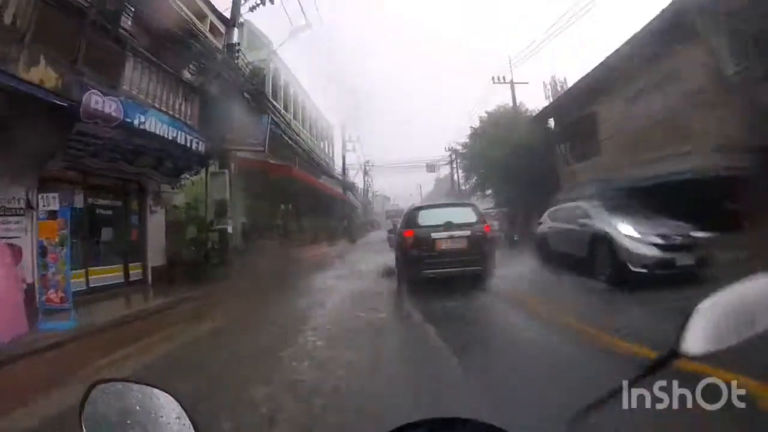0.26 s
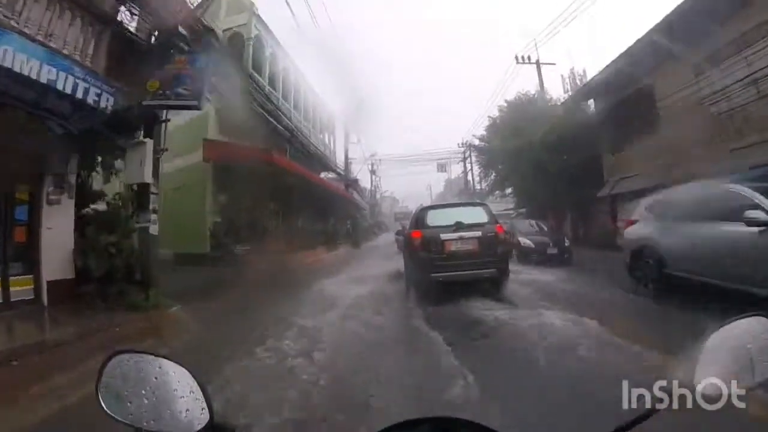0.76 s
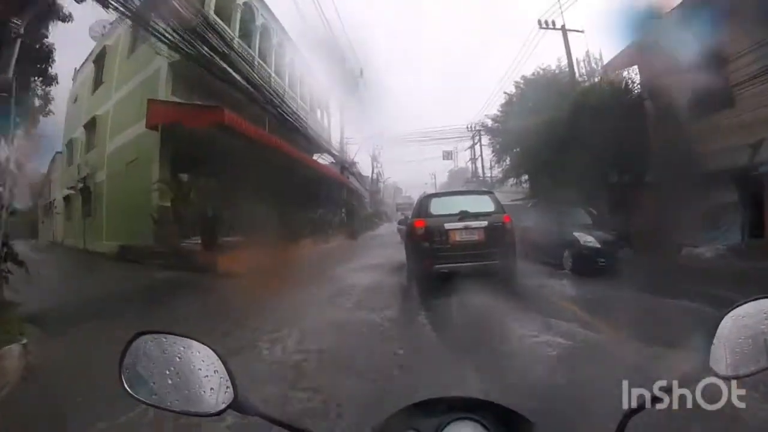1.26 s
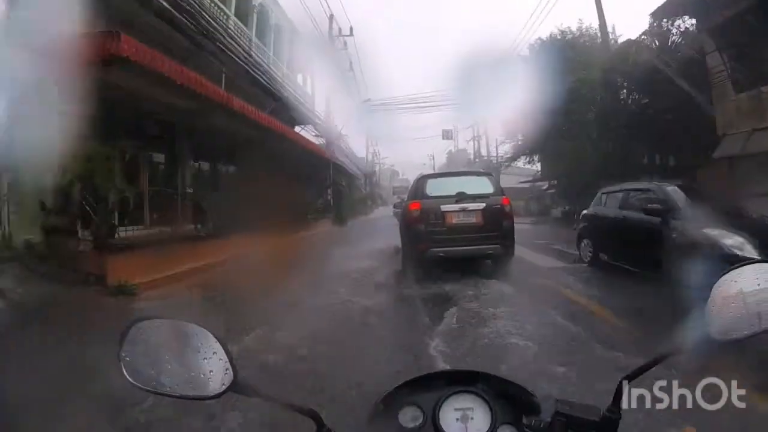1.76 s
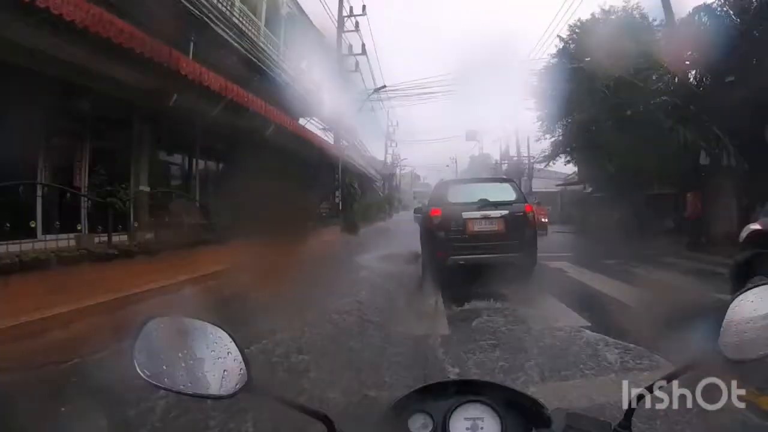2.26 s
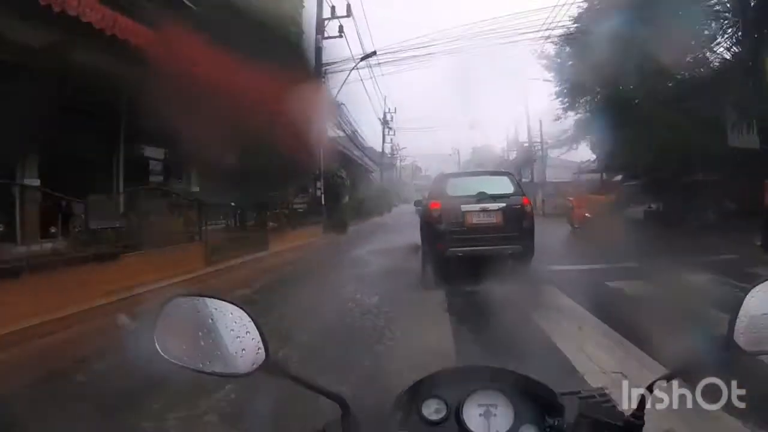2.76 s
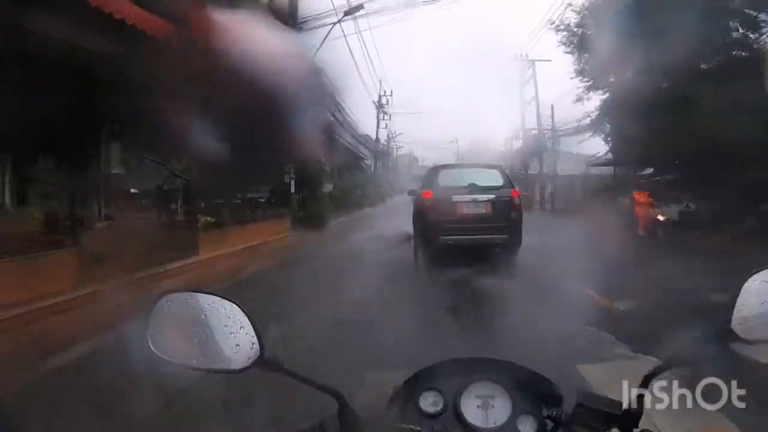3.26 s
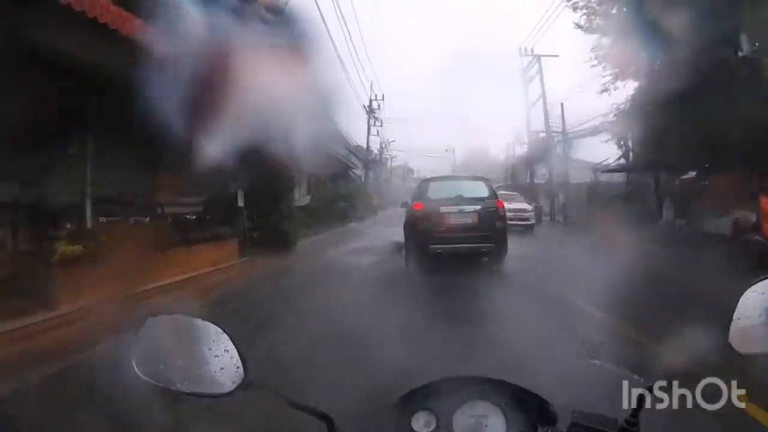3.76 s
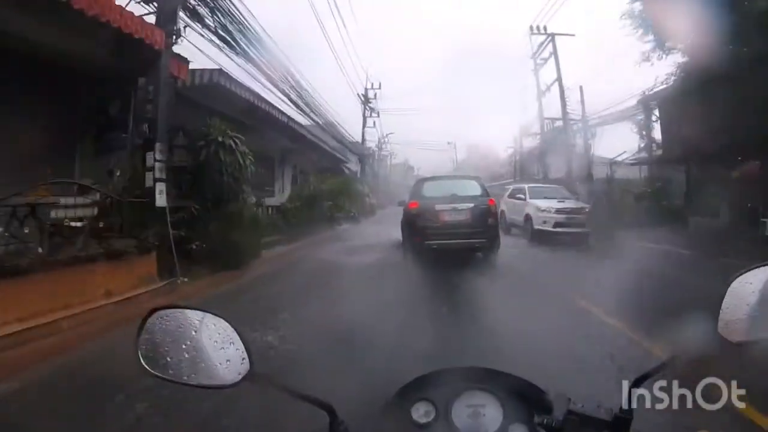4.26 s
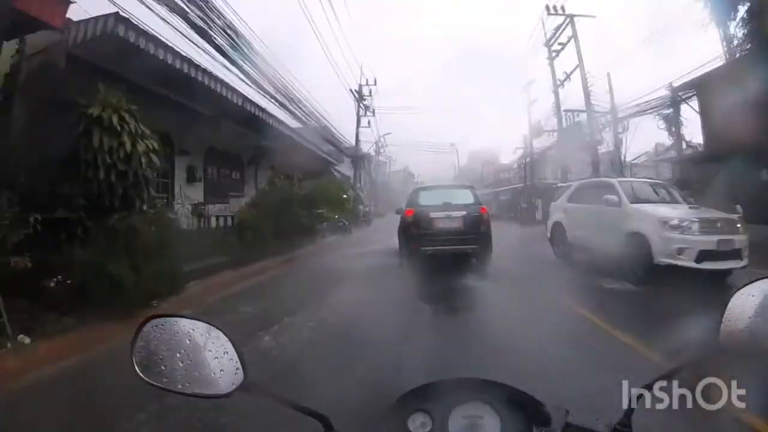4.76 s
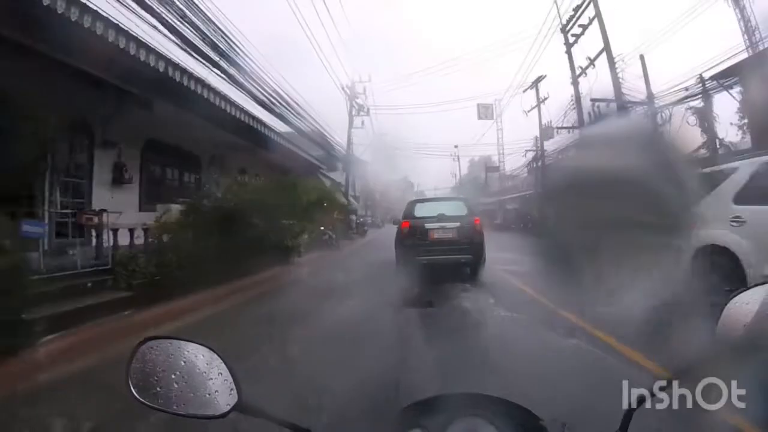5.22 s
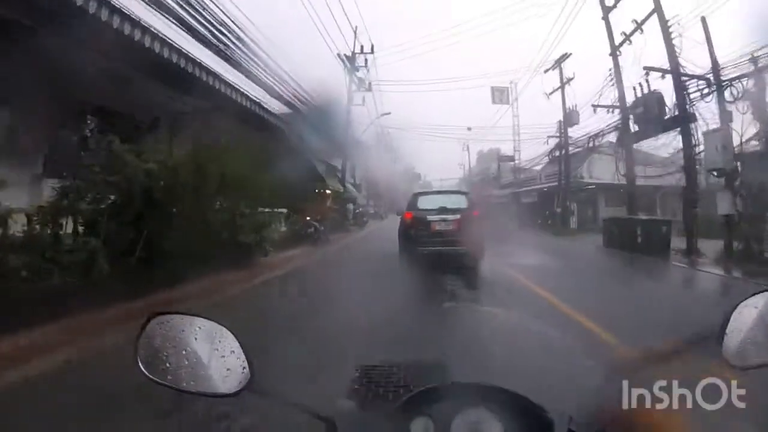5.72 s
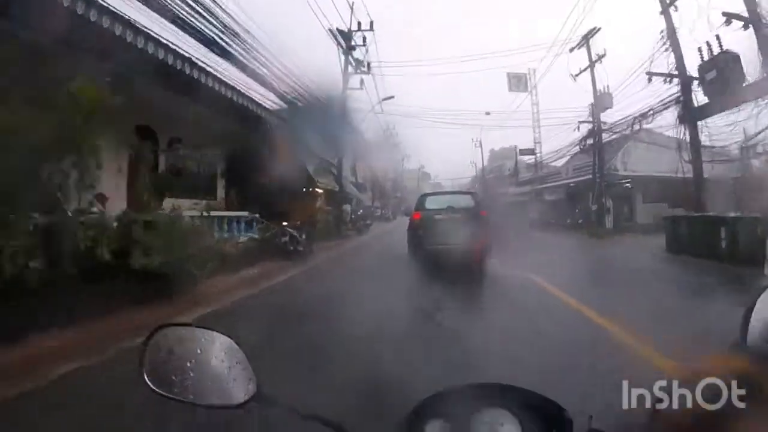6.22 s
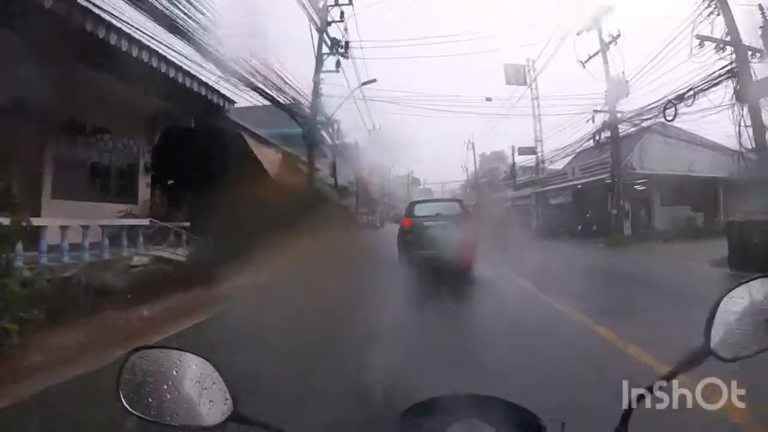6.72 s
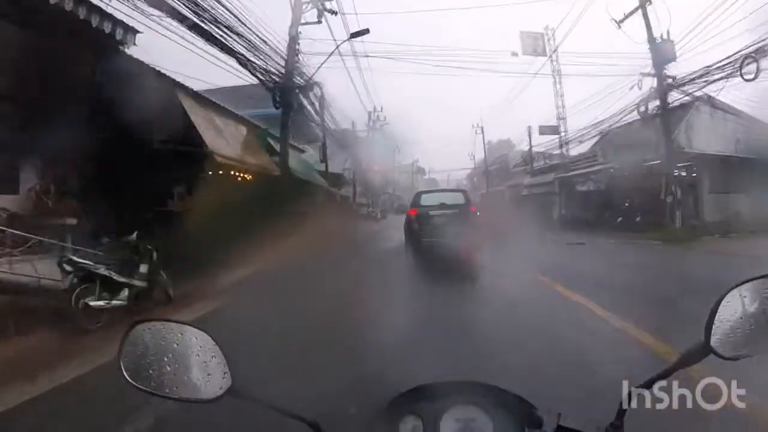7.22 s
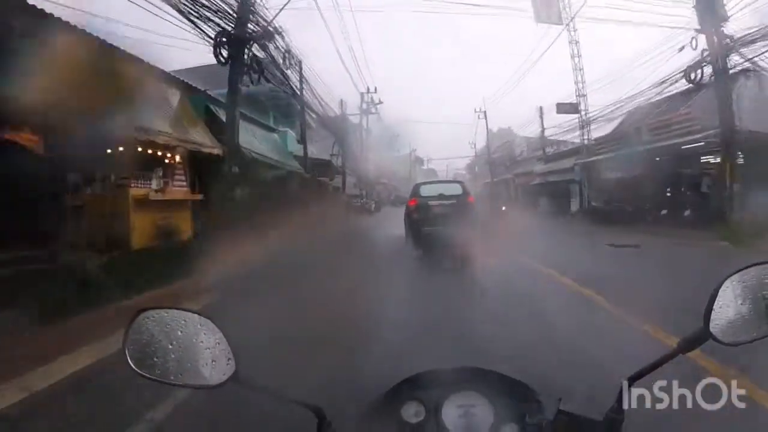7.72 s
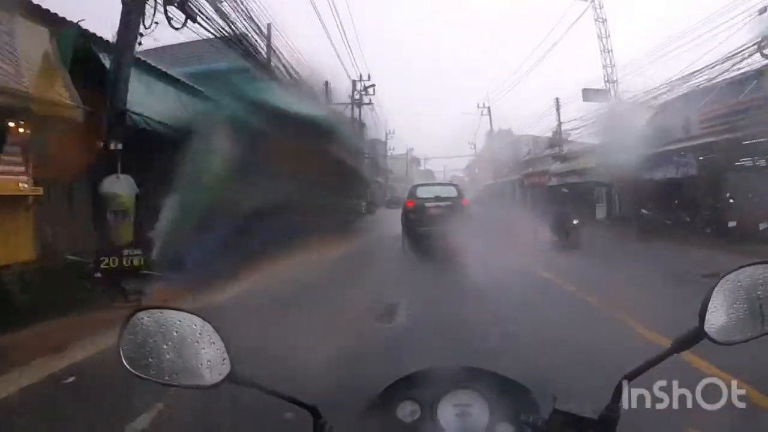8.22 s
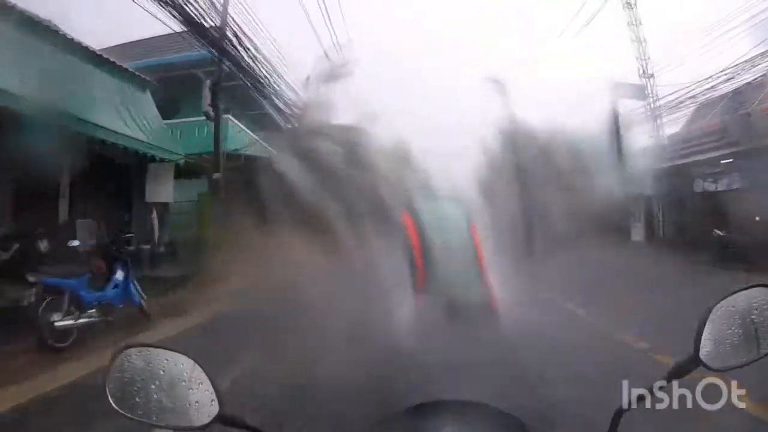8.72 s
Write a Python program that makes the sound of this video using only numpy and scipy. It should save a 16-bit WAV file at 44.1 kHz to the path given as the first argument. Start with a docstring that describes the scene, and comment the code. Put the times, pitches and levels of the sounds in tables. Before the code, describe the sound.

Small motorbike rides through a downpour, bright rain and spray hiss turning muffled as water covers the microphone, with hard drops popping and knocking.

```python
"""Water drops crack and plop on a camera's microphone port: skin crack, splat, air plop, film boom.
The camera rides on a small motorcycle in a downpour. Rain and tyre spray hiss (coloured noise) until
a water film seals the port; then the ride is muffled and the film booms under fine rain.
Case ticks (ringing modes), an engine hum (sines) and wind (low noise) complete the mix.
Strong drops make the camera's limiter duck everything; it recovers slowly."""
import sys
import numpy as np
from scipy import signal
from scipy.fft import rfft, irfft, next_fast_len
from scipy.io import wavfile
from scipy.ndimage import uniform_filter1d

SR = 44100
rng = np.random.default_rng(int(sys.argv[2]) if len(sys.argv) > 2 else 0)


def wav_out(sig):
    """Save sig, one row per channel (or a flat mono array), as 16-bit PCM at SR to the path in sys.argv[1]."""
    wavfile.write(sys.argv[1], SR, np.round(np.clip(np.atleast_2d(sig).T, -1, 1) * 32767).astype(np.int16))


N = 396018
TIME = np.arange(N) / SR


def from_db(db):
    """Decibels to gain."""
    return 10 ** (np.asarray(db) / 20)


def rms_one(x):
    """Scale to rms 1."""
    return x / np.sqrt(np.mean(x ** 2) + 1e-20)


def in_time(rows):
    """Interpolate a (t, value) curve at every sample."""
    t, value = np.transpose(rows)
    return np.interp(TIME, t, value)


def drift(rate_hz):
    """Lowpassed noise of rms 1 with corner rate_hz, computed at SR / 40."""
    step, settle = 40, 2000
    r = np.exp(-2 * np.pi * rate_hz * step / SR)
    noise = rng.standard_normal(N // step + 2 + settle)
    slow = signal.lfilter([1], [1, -2 * r, r * r], noise)[settle:]
    return np.interp(np.arange(N) / step, np.arange(len(slow)), rms_one(slow))


def bandpass(x, order, band_hz):
    """Butterworth bandpass."""
    return signal.sosfilt(signal.butter(order, band_hz, "band", fs=SR, output="sos"), x)


def coloured(x, spectrum):
    """Shape a white signal by a spectrum, interpolated over log f; rms 1."""
    hz, level_db = np.transpose(spectrum)
    size = next_fast_len(N)
    bins_hz = np.maximum(np.arange(size // 2 + 1) * SR / size, 1)
    gain = from_db(np.interp(np.log(bins_hz), np.log(hz), level_db, right=-120))
    return rms_one(irfft(rfft(x, size) * gain, size)[:N])


def ring(clicks, modes):
    """A unit click sets each mode (f/Hz, level/dB, t60/s) ringing as a dying sine."""
    out = 0
    for hz, level_db, t60_s in modes:
        r = from_db(-60 / (t60_s * SR))
        w = 2 * np.pi * hz / SR
        resonator = [0, np.sin(w)], [1, -2 * r * np.cos(w), r * r]
        out = out + from_db(level_db) * signal.lfilter(*resonator, clicks + 1e-18)  # avoids denormals
    return out


def gliding_ring(x, hz, width_hz):
    """A resonance whose centre moves: shift to 0 Hz, lowpass, shift back; rms 1."""
    turn = np.exp(2j * np.pi * np.cumsum(hz) / SR)
    pole = np.exp(-np.pi * width_hz / SR)
    return rms_one((turn * signal.lfilter([1], [1, -pole], x / turn)).imag)


def rainfall(per_s, spread_db):
    """Random impacts of either sign, exponentially spread in dB; rms 1."""
    sizes = from_db(spread_db * np.minimum(rng.exponential(1, N), 4.5))
    signs = rng.choice([-1, 1], N)
    return rms_one(sizes * signs * (rng.random(N) < per_s / SR))


FLOOD_START_S, FLOOD_TAU_S = 2.57, 0.95


def seal(t_s):
    """How far the water film has closed the port, 0 to 1: exponential approach as it floods."""
    return 1 - np.exp(-np.maximum(t_s - FLOOD_START_S, 0) / FLOOD_TAU_S)


# lesser drops from the start of flooding: rate, then mean peak, plop pitch, film ring re plop
SMALL_DROPS_PER_S, SMALL_DROP_DB, SMALL_PLOP_HZ, SMALL_RING_DB = 6.1, -25, 590, 0


def small_drops(rise_cycles=0.6, crack_hz=2100, crack_db=-19, film_hz=235):
    """Lesser drops land at random, exponentially spaced; rows as in PORT_DROPS."""
    chance = rng.standard_normal((60, 6))
    gaps = (chance[:, 0] ** 2 + chance[:, 1] ** 2) / 2  # exponential, mean 1
    times_s = FLOOD_START_S + np.cumsum(gaps) / SMALL_DROPS_PER_S
    rows = []
    for s, (size, pitch, boom, hardness) in zip(times_s, chance[:, 2:]):
        if s < TIME[-1]:
            rows.append((s, SMALL_DROP_DB + 2 * size, SMALL_PLOP_HZ * 2 ** (pitch / 4), rise_cycles,
                         crack_hz * 2 ** (pitch / 5), crack_db + 5 * hardness,
                         film_hz, SMALL_RING_DB + 4 * boom))
    return rows


CRACK_T60_S = 0.0012
SPLAT_DB, CRACK_SPLAT_DB, SPLAT_BAND_HZ = -30, -14, (900, 2500)  # re plop, re crack
PUSH_DB, PUSH_PEAK_S = -23, .006  # re plop

# modes of the camera case, also played by case(): f/Hz, level/dB (relative), t60/s
CASE_MODES = [(5200, 0, 0.00098), (6560, -5.5, 0.0072), (7230, -5, 0.0038), (8340, -3.5, 0.0026)]
# drops on the port: t/s, peak level/dB before the limiter, plop f/Hz, plop rise/cycles,
# crack f/Hz, crack level/dB re plop, film f/Hz, film ring level/dB re plop
PORT_DROPS = [(1.577, 10.5, 715, 1.14, 1890, -8, 243, 6), (1.647, 17.5, 530, 0.4, 1700, -20, 253, -14),
              (1.6742, 12.5, 515, 1.45, 2000, -28, 234, 4.5), (1.868, -8, 525, 0.51, 2100, -36, 225, 5.5),
              (2.353, -16, 520, 0.55, 2100, -70.5, 235, 11), (2.839, -9, 740, 2, 2040, 7.5, 272, 7),
              (2.862, -4.5, 710, 1.4, 2100, -22.5, 232, -5), (2.964, -9.5, 605, 0.34, 1200, -2, 226, 14),
              (3.007, -15.5, 940, 0.73, 1600, 4, 238, 8), (3.028, -7.5, 600, 0.67, 1900, -1, 258, -1.5),
              (3.131, -4.5, 480, 0.86, 2120, -31, 235, 10), (3.203, -7.5, 495, 1.6, 2300, -8, 228, -1),
              (3.336, -16.5, 695, 1.1, 2300, 7.5, 242, 10.5), (3.456, -8, 500, 0.63, 2100, -25, 236, 17),
              (3.547, -7.5, 299, 0.54, 2100, -31, 232, 7), (3.603, -12.5, 520, 0.49, 2100, -27, 242, 4),
              (3.776, 11, 810, 0.52, 1870, -1.5, 213, 15), (3.831, 29.5, 510, 0.42, 1680, -18, 240, -2.5),
              (3.996, 10.5, 607, 0.38, 1350, -22, 237, 8), (4.006, -11, 700, 1.1, 2200, -3, 245, 3),
              (4.118, 12.5, 615, 1.37, 1910, -25, 227, -1), (4.441, -13.5, 604, 0.58, 2315, -9, 247.7, 4.5),
              (4.725, -16.5, 604, 0.48, 2650, -11, 240, 5.5), (4.776, -3.5, 650, 0.8, 1090, -27, 231, 5.5),
              (4.879, 11.5, 610, 0.73, 1770, -11, 233.5, 8.5), (4.893, -4.5, 700, 1, 1900, -2, 234, 8),
              (5.107, -12, 534, 0.69, 2100, -22, 240, 10), (5.201, -14, 845, 0.36, 2260, 24, 240, -5),
              (5.3118, 15, 704, 0.69, 1880, -13.5, 223, -2.5), (5.393, -4, 560, 1.1, 2010, -18, 228, 6),
              (5.518, -8, 576, 1.1, 2000, -29, 240, -3.5), (5.609, -12.5, 670, 2.3, 2000, -10, 240, -15),
              (5.854, -5, 594, 1.2, 2000, -19, 240, -5), (5.8635, 10, 568, 0.79, 1480, -32, 243, -11.5),
              (5.9534, -3.5, 750, 0.81, 1840, -3, 239, -1.5), (6.1, -7.5, 560, 0.8, 2100, -24, 232, 17),
              (6.162, -10.5, 567, 3.5, 2000, -34, 245, -12), (6.548, -8, 570, 0.66, 2100, -22, 232, 26),
              (6.396, -5, 600, 1.3, 2186, -34, 240, -4), (6.4461, 4.5, 605, 1.1, 1520, -35, 218, 10.5),
              (6.601, -5, 590, 0.72, 1490, -21, 248, -4), (6.675, 12, 620, 0.89, 1550, -37, 214, -8.5),
              (6.766, -11.5, 606, 1.5, 2200, -11, 238, -1), (6.876, -5, 590, 1.4, 2130, -16, 240, -7),
              (6.917, 6.5, 600, 1.4, 2000, -12, 231, 1), (6.9316, 15, 600, 0.75, 2000, -17, 260, -15),
              (7.159, -3, 670, 1.1, 2100, -19, 248, -8), (7.212, -12.5, 636, 0.75, 2200, -5.5, 237, 3),
              (7.231, -5, 480, 1.6, 2090, -30, 224, 1), (7.397, -7.5, 780, 0.38, 2180, 0.5, 243, 11),
              (7.433, -13, 655, 0.88, 2210, 3, 242, 13.5), (7.498, -8, 657, 0.59, 2120, -17, 243, -16),
              (7.833, -22, 636, 0.87, 2100, -18, 242, 12), (7.915, 26, 697, 1.5, 2000, -14.5, 188, -1),
              (8.0856, 31.5, 850, 0.96, 1700, -3.5, 167, 1), (8.126, -5, 560, 0.91, 2100, -22, 243, 16),
              (8.232, -10, 560, 0.71, 2100, -22, 230, 14), (8.461, -13.5, 560, 1.5, 2000, -21, 238, 0),
              (8.618, -14.5, 565, 0.66, 2000, -17, 236, -1), (8.643, -7, 560, 0.49, 2100, -18, 218, 11),
              (8.7484, 40.5, 755, 0.48, 1830, -1.5, 131, -1.5),
              (8.841, -21.5, 550, 0.79, 1980, -1, 240, -5), (8.887, -10, 520, 0.51, 2100, 1, 243, 16),
              (8.928, -16, 670, 0.66, 2120, 10.5, 243, 15)]


def port_drops(film_decay_s=0.012, film_damping=0.3, film_rise_s=0.0014, contact_s=0.00008,
               hardening=0.01, mix_db=2, case_db=-7, splat_s=0.0012):
    """Contact cracks and splats on water and case, squeezed air plops, the pushed film rings out."""
    out = np.zeros(N)
    age = TIME[:SR // 10]
    for s, peak_db, plop_hz, rise_cycles, crack_hz, crack_db, film_hz, ring_db in (
            list(PORT_DROPS) + small_drops()):
        # each hit: own mix of case modes; stronger drops: shorter, brighter contact
        modes = [(crack_hz, 0, CRACK_T60_S)]
        for hz, db, t60_s in CASE_MODES:
            modes.append((hz, db + case_db + mix_db * rng.standard_normal(), t60_s))
        contact = age * np.exp(-age / contact_s * from_db(hardening * peak_db))
        crack = ring(contact, modes)
        crack = from_db(crack_db) * crack / np.abs(crack).max()

        splat = rms_one(bandpass(rng.standard_normal(len(age)), 2, SPLAT_BAND_HZ))
        splat_gain = from_db(SPLAT_DB) + from_db(CRACK_SPLAT_DB + crack_db)
        splat = splat_gain * splat * np.exp(-age / splat_s)

        cycles = plop_hz * age
        rise = cycles / rise_cycles
        plop = (rise * np.exp(1 - rise)) ** 2 * np.sin(2 * np.pi * cycles)

        # hard drops tear the film: it knocks instead of ringing
        decay_s = film_decay_s * from_db(-film_damping * max(peak_db, 0))
        boom_shape = (1 - np.exp(-age / film_rise_s)) * np.exp(-age / decay_s)
        boom = from_db(ring_db) * boom_shape * np.sin(2 * np.pi * film_hz * age)
        push = from_db(PUSH_DB) * age / PUSH_PEAK_S * np.exp(1 - age / PUSH_PEAK_S)

        hit = plop + splat + push + boom - crack
        hit = from_db(peak_db) * hit / np.abs(hit).max()
        start = round(s * SR)
        out[start:start + len(age)] += hit[:N - start]
    return out


WETTED_S, WET_DRAIN_TAU_S = 1.6, 0.59  # first wetting
SPRAY_DB, WET_LOSS_DB, SEALED_LOSS_DB = -24, 9.5, 43.5  # open port, losses to water
SPIT_DB, SPIT_T60_CYCLES, SPIT_RANGE_HZ = -16, 34, (2300, 8060)  # dB re hiss before colouring

# spectrum of rain and tyre spray: f/Hz, level/dB (relative, per Hz)
SPRAY_SPECTRUM = [(120, -1.5), (200, -5.5), (300, 6.5), (600, 4), (1000, -0.5), (2400, -1.5), (4300, -7.5),
                  (5200, 3), (6500, -3.5), (8000, -10.5), (10000, -21), (12500, -36), (13500, -50)]


def spray(flicker_db=1.18):
    """Road splashes merge into a hiss; nearer ones crackle and spit. Water on the port muffles it."""
    wet = (TIME > WETTED_S) * np.exp(-np.abs(TIME - WETTED_S) / WET_DRAIN_TAU_S)
    level_db = SPRAY_DB - WET_LOSS_DB * wet - SEALED_LOSS_DB * seal(TIME)
    level_db = level_db + 1.5 * drift(11) + flicker_db * drift(90)
    crackle = from_db(-9) * rainfall(per_s=380, spread_db=4)
    splashes = rainfall(per_s=300, spread_db=3.5)
    pitches_hz = np.geomspace(*SPIT_RANGE_HZ, 14)
    dealt = rng.integers(0, len(pitches_hz), N)  # one pitch per splash
    spits = 0
    for k, hz in enumerate(pitches_hz):
        spits = spits + ring(splashes * (dealt == k), [(hz, 0, SPIT_T60_CYCLES / hz)])
    grain = rng.standard_normal(N) + crackle + from_db(SPIT_DB) * rms_one(spits)
    return from_db(level_db) * coloured(grain, SPRAY_SPECTRUM)


BOOM_DB, PATTER_DB = -19, -29.5  # before RAIN_ON_FILM and skin gain
FILM_HZ, FILM_WIDTH_HZ, FILM_WAVER_HZ = 229, 13, 8  # boom; wavers as the water shifts (rms)
FILM_RING_DB, FILM_RING_WIDTH_HZ = -30, 120  # upper ring, part of the patter
FILM_COMPLETE_AT = 0.5  # share of the seal from which the film rings fully

# how hard rain beats on the film: t/s, level/dB (boom; the patter takes half the dB)
RAIN_ON_FILM = [(2.7, -7), (3.4, -1), (3.7, -1), (4.3, -3.5), (5.7, -1), (6.45, 0.5), (7.1, -5.5),
                (7.6, -4), (7.85, 1.5), (8.3, -5), (8.65, 1), (8.98, -0.5)]
# upper ring, sinks as water gathers, rises as it runs off: t/s, f/Hz
FILM_RING_HZ = [(2.8, 794), (3.6, 766), (4.5, 708), (5.6, 646), (6.3, 582), (7.2, 620), (7.8, 758),
                (8.98, 735)]
# spectrum of the patter: f/Hz, level/dB (relative, per Hz)
PATTER_SPECTRUM = [(150, -30), (300, -0.5), (400, 1), (540, -0.5), (750, 1), (930, -3), (1200, -13.5),
                   (1600, -20.5), (2300, -27), (3100, -35.5), (4300, -47), (6600, -55), (10000, -61)]


def film():
    """Fine rain patters on the water over the port and keeps it booming in lumps."""
    skin = np.minimum(seal(TIME) / FILM_COMPLETE_AT, 1)
    rain_db = in_time(RAIN_ON_FILM)
    impacts = rainfall(per_s=1900, spread_db=3)
    lumps = drift(14)
    boom_hz = FILM_HZ + FILM_WAVER_HZ * drift(5)
    boom = from_db(BOOM_DB) * gliding_ring(impacts * from_db(3.8 * lumps), boom_hz, FILM_WIDTH_HZ)
    pats = coloured(impacts * from_db(1.2 * lumps + 1.8 * drift(30)), PATTER_SPECTRUM)
    upper_ring = gliding_ring(pats, in_time(FILM_RING_HZ), FILM_RING_WIDTH_HZ)
    patter = from_db(PATTER_DB) * pats + from_db(FILM_RING_DB) * upper_ring
    return skin * from_db(rain_db) * boom + np.sqrt(skin) * from_db(.5 * rain_db) * patter


STRAY_TICKS_DB, SPRINKLE_DB = -78, -77.5  # click rms into the modes at full seal
TICK_BAND_HZ = (4700, 7400)

# loudest drops on the case: t/s, click level/dB (relative)
CASE_TICKS = [(0.032, -3.5), (0.179, -7.5), (0.292, -7.5), (0.588, -8), (.742, -16), (0.808, -7),
              (0.953, -9.5), (1.256, -14), (1.33, -15), (1.408, -12), (2.782, -16), (3.47, -24.5),
              (4.595, -37), (4.65, -41), (4.741, -39), (4.755, -35), (5.104, -43), (5.197, -28),
              (5.227, -33), (5.608, -29), (5.727, -44), (5.853, -24), (6.097, -34.5), (6.427, -32),
              (6.446, -30.5), (6.56, -41), (6.591, -28), (6.801, -39), (6.874, -30), (7.031, -30),
              (7.152, -33), (7.177, -34), (7.44, -40), (7.498, -30), (7.572, -39), (7.607, -32),
              (7.667, -35), (7.752, -27), (7.785, -39), (7.862, -35), (8.265, -39), (8.3, -34),
              (8.514, -34), (8.636, -31), (8.887, -33), (8.927, -31)]


def case():
    """Small hard drops tick on the case, each with its own mode mix; strays top a fine sprinkle."""
    clicks = np.zeros(N)
    for s, level_db in CASE_TICKS:
        clicks[round(s * SR)] = from_db(level_db + 2)
    strays = from_db(STRAY_TICKS_DB) * rainfall(per_s=50, spread_db=4)
    sprinkle = from_db(SPRINKLE_DB) * rainfall(per_s=760, spread_db=0)
    clicks = clicks + np.sqrt(seal(TIME)) * (sprinkle + strays)
    ticks = 0
    for mode in CASE_MODES:
        ticks = ticks + ring(clicks * from_db(2 * rng.standard_normal(N)), [mode])
    return bandpass(ticks, 3, TICK_BAND_HZ)


ENGINE_FLUTTER_DB, ENGINE_BLUR_TURNS = 2.6, .011  # rms

# crank speed, the bike eases off, then gathers speed: t/s, f/Hz
CRANK_HZ = [(0, 52.3), (.3, 52.7), (.5, 52.1), (.85, 53), (1.8, 49.2), (2.3, 47.7), (2.8, 47.3),
            (3.7, 44.5), (4.1, 45.6), (4.7, 47.6), (5.1, 49.1), (5.5, 50.2), (5.9, 50.4), (6.9, 52.7),
            (7.3, 53.2), (7.8, 54.3), (8.5, 55.4), (8.98, 55.8)]
# engine loudness: t/s, level/dB
ENGINE_LEVEL = [(0, -26), (1.5, -28), (2.6, -29), (4, -26.5), (5.15, -24.5), (7, -32.5), (8.98, -26.5)]
# engine note: multiple of crank speed, level/dB (relative)
ENGINE_PARTIALS = [(2, 5), (3, 6), (4, -0.5), (5, 0.5), (6, -6), (7, 0), (8, 1.5), (9, -4.5), (10, -0.5),
                   (11, -2), (12, -13), (13, -12.5), (14, -9), (15, -5)]


def engine():
    """Single cylinder: crank multiples flutter in level and phase, the higher the more blurred."""
    crank_hz = in_time(CRANK_HZ) * (1 + .003 * drift(10))
    turns = np.cumsum(crank_hz) / SR
    note = 0
    for multiple, db in ENGINE_PARTIALS:
        blurred_turns = turns + ENGINE_BLUR_TURNS * drift(9)
        level = from_db(db + ENGINE_FLUTTER_DB * drift(7))
        note = note + level * np.sin(2 * np.pi * (multiple * blurred_turns + rng.random()))
    return from_db(in_time(ENGINE_LEVEL)) * rms_one(note)


# head wind: t/s, level/dB (before flutter)
WIND_LEVEL = [(0, -25), (1.7, -22), (2.3, -30), (3, -25.5), (6.3, -25.5), (7.6, -26), (8.98, -21)]
# air buffets on the port: t/s, level/dB (relative), Gaussian half length/s
BUFFETS = [(.35, -16.5, .03), (1.45, -18.5, .05), (4.42, -22, .04), (4.78, -22, .05), (5.19, -18.5, .02),
           (7.11, -12, .025)]
# spectra of head wind and buffets: f/Hz, level/dB (relative, per Hz)
WIND_SPECTRUM = [(12, -15.5), (28, -1.5), (50, 4.5), (80, -5), (120, 2.5), (170, -5), (260, -12.5),
                 (500, -22), (1200, -48)]
BUFFET_SPECTRUM = [(12, -5), (35, 1.5), (110, -12.5), (250, -22), (600, -40)]


def wind():
    """Lumpy turbulence at the port; buffets thump at its lowest pitches."""
    level_db = in_time(WIND_LEVEL) + 2 * drift(33)
    turbulence = from_db(level_db) * coloured(rng.standard_normal(N), WIND_SPECTRUM)
    swell = 0
    for s, db, half_s in BUFFETS:
        swell = swell + from_db(db + 3.5) * np.exp(-.5 * ((TIME - s) / half_s) ** 2)
    return turbulence + swell * coloured(rng.standard_normal(N), BUFFET_SPECTRUM)


def scene():
    """Everything meets at one microphone."""
    return (port_drops() + spray() + film() + case() + engine() + wind())[None]


LIMIT, DEEPEST_SLOW_GAIN = .9, .055
BLOCK_S, FIRST_BLOCK_S, RECOVERY_PER_S = .032, .007, .65  # recovery: gain per s


def limiter(x):
    """Blockwise gain: snaps down a block ahead of a peak, creeps back on a straight ramp."""
    edges_s = np.arange(FIRST_BLOCK_S, TIME[-1], BLOCK_S)
    starts = np.append(0, np.round(edges_s * SR).astype(int))
    peaks = np.maximum.reduceat(np.abs(x[0]), starts)
    allowed = LIMIT / np.maximum(peaks, LIMIT)
    held = np.minimum(allowed, np.append(allowed[1:], 1))
    ramp = RECOVERY_PER_S * starts / SR
    # gain below DEEPEST_SLOW_GAIN returns to it at once
    slow = np.minimum.accumulate(np.maximum(held, DEEPEST_SLOW_GAIN) - ramp) + ramp
    gain = np.repeat(np.minimum(held, slow), np.diff(starts, append=N))
    return x * uniform_filter1d(gain, size=5)


OFFSET, LOW_CUT_HZ, CUTOFF_HZ = .035, 18, 14500


def record(dry):
    """Limit with a small offset, so that gain steps click; then cut bottom and top."""
    limited = limiter(dry + OFFSET) - OFFSET
    limited = signal.sosfilt(signal.butter(1, LOW_CUT_HZ, "high", fs=SR, output="sos"), limited)
    return signal.sosfilt(signal.cheby2(12, 70, CUTOFF_HZ, fs=SR, output="sos"), limited)


dry = scene()
out = record(dry)
wav_out(out)
```